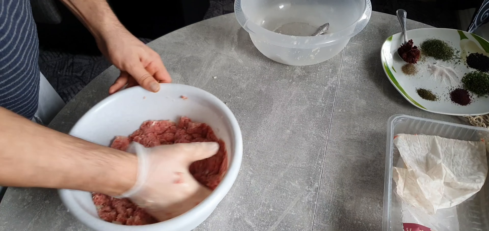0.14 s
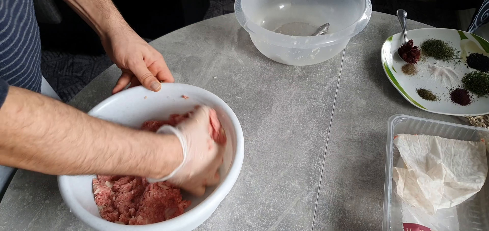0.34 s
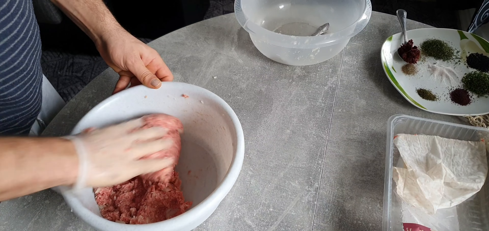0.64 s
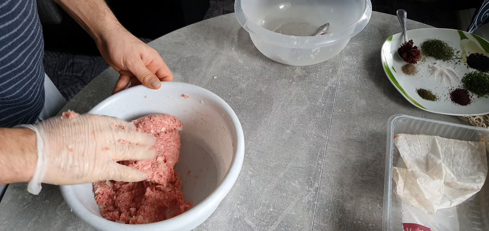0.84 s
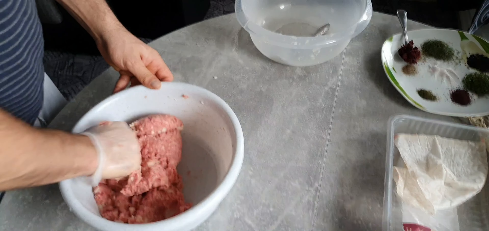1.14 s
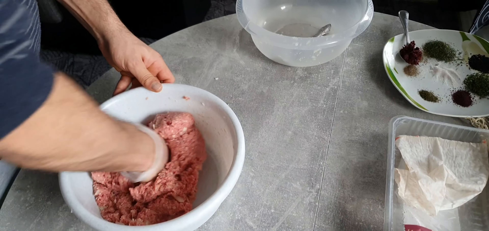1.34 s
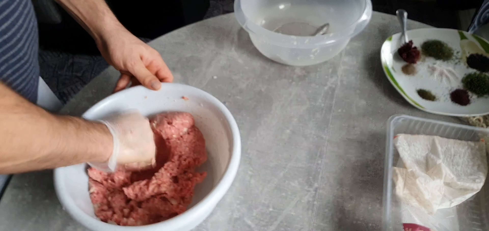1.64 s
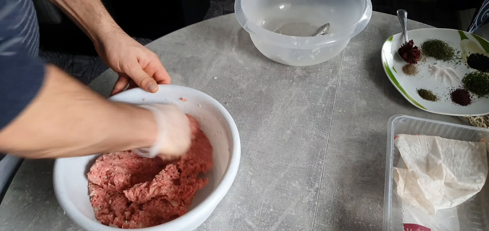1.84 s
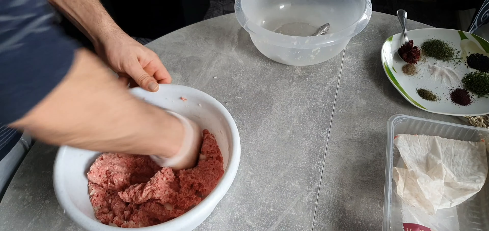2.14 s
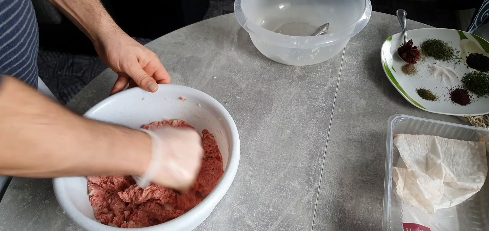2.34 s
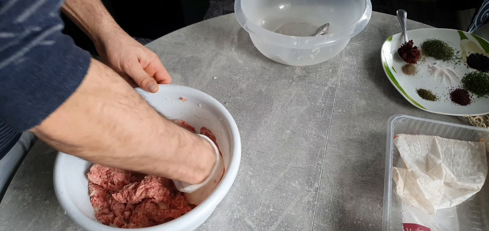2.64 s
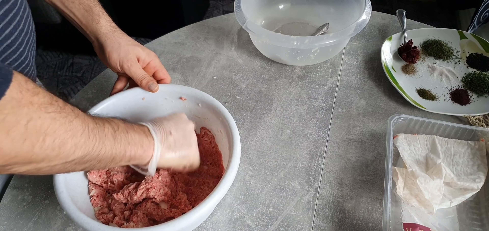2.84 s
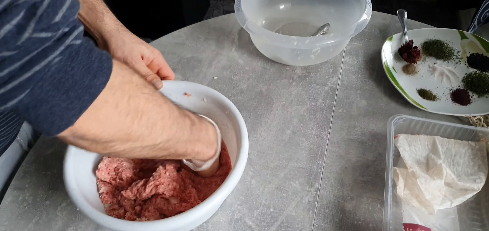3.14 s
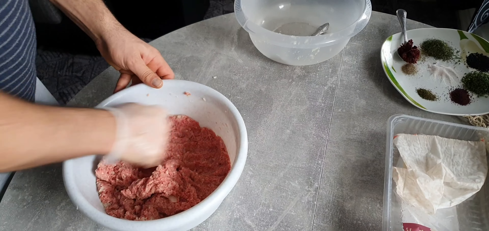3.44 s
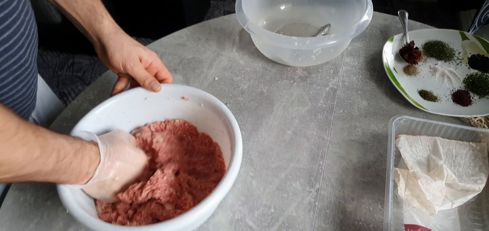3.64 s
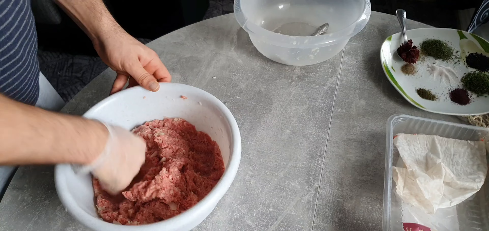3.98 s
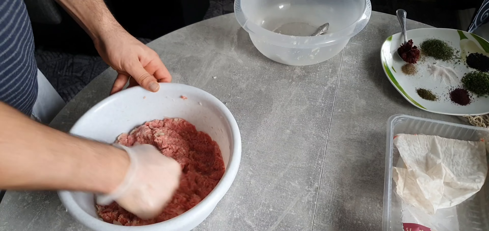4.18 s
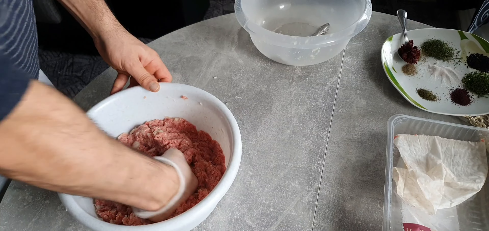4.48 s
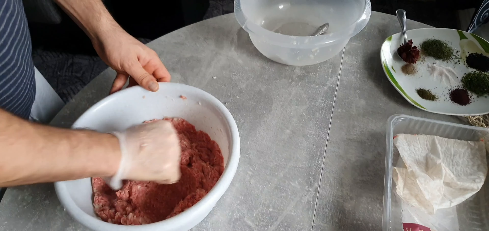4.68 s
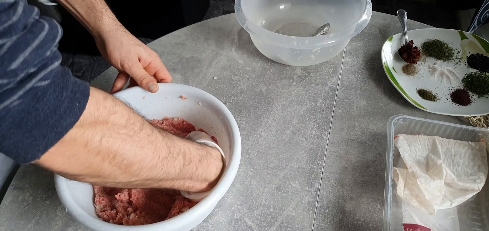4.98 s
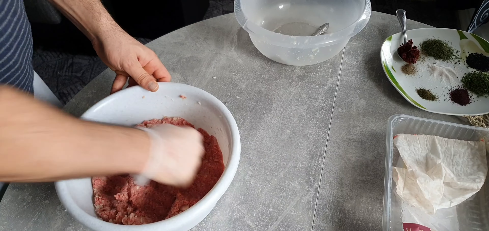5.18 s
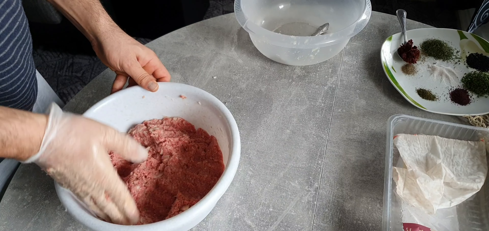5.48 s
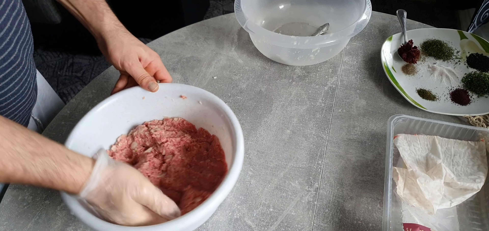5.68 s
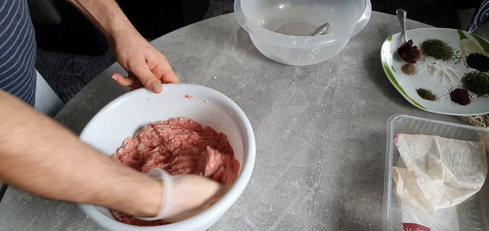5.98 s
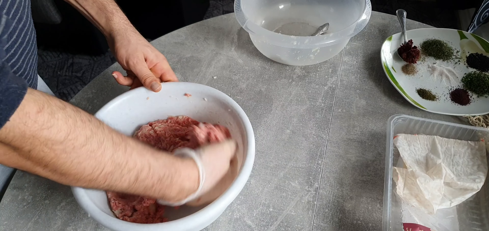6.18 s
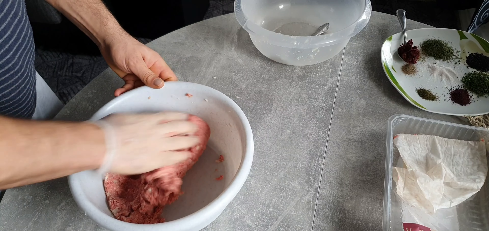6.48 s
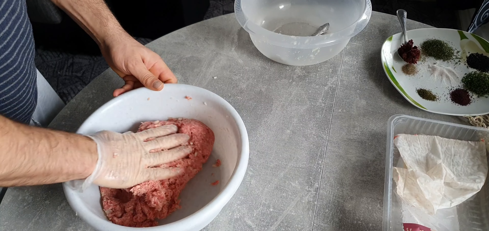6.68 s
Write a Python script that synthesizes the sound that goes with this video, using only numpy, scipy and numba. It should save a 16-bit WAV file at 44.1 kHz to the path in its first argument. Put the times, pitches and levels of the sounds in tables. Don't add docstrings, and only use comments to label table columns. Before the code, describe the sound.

A gloved hand works raw mince in a plastic bowl, very close, in a small quiet kitchen. Irregular wet squelches, popping air pockets and tiny sticky snaps of the glove peeling away come in uneven strokes. Firm slaps around one to one and a half seconds, three, and four to four and a half seconds make the bowl thump and the table hum low. The ending is softer, with light rubbing and crackle.

```python
import sys
import numpy as np
from scipy import signal
from scipy.fft import rfft, irfft
from scipy.io import wavfile
from scipy.ndimage import uniform_filter1d
from numba import njit

SR = 44100
rng = np.random.default_rng(int(sys.argv[2]) if len(sys.argv) > 2 else 0)


def to_wav(s):
    ch = np.atleast_2d(s).T
    pcm = np.round(np.clip(ch, -1, 1) * 32767)
    wavfile.write(sys.argv[1], SR, pcm.astype(np.int16))


def natural_amplitude(level_db):
    exponent = np.asarray(level_db, float) / 20
    return 10 ** exponent


N = 300762


def level(x, db):
    return x * natural_amplitude(db) / np.sqrt(np.mean(x ** 2))


def colour(x, points):
    hz, db = np.transpose(points)
    f = np.maximum(np.arange(N // 2 + 1) * SR / N, 1)
    gain = natural_amplitude(np.interp(np.log(f), np.log(hz), db))
    return irfft(rfft(x) * gain, N)


def band(x, lo_hz, hi_hz):
    return signal.sosfilt(signal.butter(2, [lo_hz, hi_hz], "band", fs=SR, output="sos"), x)


def ring(x, modes, damp=0.86):
    out = 0
    for hz, db, t60_s in modes:
        pole = np.exp(2j * np.pi * hz / SR - np.log(1000) / (t60_s * damp * SR))
        out = out + natural_amplitude(db) * signal.lfilter([1], [1, -pole], x).imag
    return out


def walk(rate_hz):
    hold = int(SR / rate_hz)
    return uniform_filter1d(np.repeat(rng.standard_normal(N // hold + 1), hold), hold)[:N]


def steady(x, span_s):
    power = uniform_filter1d(np.mean(x ** 2, axis=0), int(span_s * SR))
    return x / np.sqrt(power + 1e-12)


@njit
def bubbles(at_s, hz, cycles, size, glide, n, sr):
    out = np.zeros(n)
    for k in range(len(at_s)):
        step, phase, gain = 2 * np.pi * hz[k] / sr, 0., size[k]
        fall = np.exp(-hz[k] / sr / cycles[k])
        rise = 1 + glide * hz[k] / sr / cycles[k]
        i = int(at_s[k] * sr)
        while gain > .004 * size[k] and i < n and step < 2.8:
            out[i] += gain * np.sin(phase)
            phase, step, gain, i = phase + step, step * rise, gain * fall, i + 1
    return out


SWELL_DB, ONSET_DB_PER_S = 12.5, 490.5
SMOTHER_DB_PER_S = 126


def strokes(t, start_s, swell_s, hold_s, db, sag, fall, until_s=np.inf):
    coarse_t = t[::32]
    power = np.zeros(len(coarse_t))
    for end, start, up, hold, top_db in np.broadcast(until_s, start_s, np.maximum(swell_s, .001), hold_s, db):
        age = coarse_t - start - up
        shape = np.minimum(age, 0) * SWELL_DB / up
        shape -= sag * np.clip(age, 0, hold) + fall * np.maximum(age - hold, 0)
        shape += ONSET_DB_PER_S * np.minimum(age + up, 0)
        shape -= SMOTHER_DB_PER_S * np.maximum(coarse_t - end, 0)
        power += natural_amplitude(np.maximum(top_db + shape, -200)) ** 2
    return np.interp(t, coarse_t, power)


# (f/Hz, density/dB)
KITCHEN_SPECTRUM = [(18, -37), (30, -27), (118, 8), (233, -5), (319, -1.5), (404, -24), (526, -10),
                    (2410, -15.5), (16000, -25)]


def kitchen():
    return level(colour(rng.standard_normal((2, N)), KITCHEN_SPECTRUM), -76)


# (t/s, swell/s, hold/s, squelch level/dB, crackle above it/dB)
RUB_STROKES = [(-.02, 0.014, 0.23, -50.5, -19), (.22, 0.056, 0.13, -55.5, -3.5),
               (.46, 0.034, 0.069, -63.5, 4.5), (1.112, 0.032, 0.0072, -64.5, 2),
               (1.19, 0.025, 0.089, -56.5, 0), (1.50, 0.025, 0.017, -64.5, 0),
               (1.59, 0.015, 0.013, -44, -9), (2.41, .005, 0.05, -68, -9), (2.487, 0.0032, 0.14, -67.5, 6),
               (3.008, 0.014, .035, -51.5, -8), (3.09, 0.016, 0.052, -56, 3), (3.58, 0.048, 0.02, -49, -5),
               (3.635, 0.039, 0.1, -57, 8.5), (3.80, 0.0088, 0.097, -64, 4.5),
               (4.876, 0.018, 0.043, -59, -1), (4.925, 0.015, 0.02, -65, 7),
               (5.66, 0.086, 0.2, -51.5, -2.5), (5.85, 0.038, 0.11, -56, -5), (5.97, 0.023, 0.17, -61.5, 0),
               (6.20, 0.054, 0.04, -58.5, -2.5), (6.50, 0.12, 0.047, -56, -0.5)]
# (t/s, swell/s, hold/s, squelch level/dB, crackle above it/dB)
PEEL_STROKES = [(.04, 0.055, 0.078, -48.5, 2), (.55, 0.016, 0.2, -72.5, 15.5),
                (.70, 0.024, 0.026, -66.5, -1), (1.30, 0.1, 0.0027, -52.5, 6),
                (1.563, 0.0021, 0.039, -45.5, 2), (1.575, 0.015, 0.015, -37, 3),
                (1.82, 0.076, 0.15, -52, -1.5), (2.02, 0.01, .018, -55.5, -2.5),
                (2.124, 0.03, 0.036, -47.5, -7.5), (2.20, 0.0049, 0.0096, -52, 0),
                (2.43, 0.078, 0.0068, -49.5, -6), (2.711, 0.021, 0.0069, -51.5, -4),
                (2.73, 0.043, 0.0057, -51.5, -3), (3.305, 0.019, 0.047, -52, -2.5),
                (3.931, 0.0034, 0.0075, -57.5, 2.5), (3.945, 0.011, 0.013, -41.5, -12),
                (3.985, 0.0055, .004, -61, 12.5), (4.06, .01, .1, -84, 8), (4.19, 0.088, 0.15, -57, 0.5),
                (4.51, 0.049, .012, -65.5, 7), (4.563, 0.0067, 0.055, -48, -7),
                (4.81, 0.063, 0.068, -63, 1), (4.964, 0.0021, 0.0043, -67, 16),
                (5.095, 0.047, 0.04, -53.5, -4), (5.165, 0.017, 0.031, -58, -2.5),
                (5.31, 0.021, 0.097, -84.5, 10), (5.50, 0.07, 0.025, -69, -3),
                (5.59, 0.0069, 0.13, -59.5, -1), (6.29, .02, .05, -76, 11), (6.36, 0.11, 0.076, -70, 11.5),
                (6.68, .02, 0.035, -72, 6), (6.76, 0.069, .05, -62.5, 0)]
# (t/s, squelch level/dB, crackle above it/dB)
SLAP_HITS = [
    (0.434, -59.5, -3),
    (1.161, -47.5, -3.5),
    (1.6405, -41, -4.5),
    (3.0505, -45.5, -5),
    (3.0585, -49.5, 4),
    (3.574, -51.5, -21),
    (3.996, -54.5, -14),
    (4.04, -50, -22),
    (4.585, -47.5, -3.5),
    (5.292, -57.5, -9.5),
]
# (t/s, hold/s, bowl wall level/dB)
BASE_SCRAPES = [(0.133, 0.025, -47.5), (0.543, 0.025, -54.5), (1.332, 0.12, -52.5), (1.834, 0.069, -57.5),
                (2.125, 0.14, -64.5), (2.25, 0.024, -65), (2.75, 0.02, -61), (3.571, 0.026, -42.5),
                (3.687, 0.075, -49), (4.207, 0.18, -65.5), (4.562, 0.04, -58), (5.3, 0.017, -63),
                (6.087, 0.022, -56.5), (6.24, 0.054, -61), (6.38, 0.12, -64.5)]
# (wall re squelch/dB, deep re squelch/dB, then falls/dB/s: squelch, crackle, wall, deep)
PEEL_RELEASE = (-44.5, -19.5, 247, 231, 145, 190)
RUB_RELEASE = (-0.5, -5.5, 178, 179, 154, 154.5)
SLAP_RELEASE = (7, -7.5, 337, 222, 181, 144)
SAG_DB_PER_S = 29.5


def hand(t):
    slaps = [(s, 0.0007, 0.0037, db, crackle_db) for s, db, crackle_db in SLAP_HITS]  # swell/s, hold/s
    slap_s = np.append(np.transpose(SLAP_HITS)[0], np.inf)
    kinds = ((PEEL_STROKES, PEEL_RELEASE), (RUB_STROKES, RUB_RELEASE), (slaps, SLAP_RELEASE))
    power = 0
    for rows, (wall_db, deep_db, *falls) in kinds:
        s, swell, hold, db, crackle_db = np.transpose(rows)
        next_slap = slap_s[np.searchsorted(slap_s, s + .005)]
        offsets_db = (0, crackle_db, wall_db, deep_db)
        power = power + np.array([strokes(t, s, swell, hold, db + above, SAG_DB_PER_S, fall, next_slap)
                                  for above, fall in zip(offsets_db, falls)])
    s, hold, db = np.transpose(BASE_SCRAPES)
    power[2] += strokes(t, s, 0.0034, hold, db, SAG_DB_PER_S, 181)
    return np.sqrt(power)


def swarm(lo_hz, hi_hz, cycles, spread_db, hiss_db, flutter_db, count):
    c = rng.random((4, count))
    clump = np.repeat(rng.random((2, count // 12)), 12, axis=1)
    at_s = clump[0] * N / SR - .012 * np.log(c[0])
    hz = lo_hz * (hi_hz / lo_hz) ** clump[1] * 1.44 ** (c[1] - .5)
    size = natural_amplitude(-spread_db * np.log(c[2] + 0.011)) * np.sqrt(hz)
    popping = bubbles(at_s, hz, cycles * (.5 + c[3]), size, 0.137, N, 1. * SR)
    hiss = band(rng.standard_normal((3, N)), lo_hz, hi_hz)
    scattered = level(0.048 * hiss[0] + hiss[1:], hiss_db)
    return level((level(popping, 0) + scattered) * natural_amplitude(flutter_db * walk(60)), 0)


# (f/Hz, gain/dB)
WET_SPECTRUM = [(150, -18.5), (250, -7.5), (292, -10.5), (330, -20.5), (367, -12.5), (414, -15),
                (735, -17.5), (1200, -14), (1980, -10), (6590, -2), (7310, -11.5), (10700, -6), (13400, -6),
                (16000, -16.5)]
THREADS_PER_S, THREADS_DB = 70, -13


def mince(t):
    squelch, crackle, rub, depth = hand(t)
    wet = swarm(836, 4485, cycles=2.64, spread_db=2.5, hiss_db=-9, flutter_db=3.5, count=18000)
    fine = swarm(1900, 16000, cycles=0.2, spread_db=3.2, hiss_db=-3, flutter_db=2.0, count=48000)
    wall = swarm(296.0, 946, cycles=1.63, spread_db=3.0, hiss_db=4.0, flutter_db=2.5, count=9000)
    wet, fine, wall = (level(colour(v, WET_SPECTRUM), 0) for v in (wet, fine, wall))
    threads = rng.standard_normal(N) * (rng.random(N) < THREADS_PER_S / SR)
    fine = fine + level(band(threads, 3500, 15000), THREADS_DB)
    deep = level(band(wet[:, ::-1], 650, 2450), 0)
    return depth * deep + squelch * wet * natural_amplitude(-0.27) + crackle * fine * natural_amplitude(1.0) + rub * wall * natural_amplitude(-3.5)


# (t/s, sway level/dB, plate above it/dB)
TABLE_JOLTS = [(.0, -42, -2.5), (0.729, -49, -28), (0.874, -59, -9), (1.156, -37.5, -2.5),
               (1.644, -31, -5.5), (2.487, -36.5, -6), (3.054, -33, -1.5), (3.578, -43, -1.5),
               (4.04, -39.5, -21), (4.586, -33, -16), (4.882, -36.5, -11)]
# (t/s, hold/s, sway level/dB, plate above it/dB)
BOWL_LEANS = [(0.123, 0.36, -52.5, -2.5), (0.472, 0.11, -59.5, -1), (1.3, 0.21, -44.5, -9.5),
              (1.69, 0.031, -35, -11), (1.83, 0.054, -49.5, -2), (1.948, 0.089, -49.5, -14),
              (2.14, 0.08, -54.5, -24), (2.233, 0.18, -47, -16), (2.61, 0.27, -48.5, -17.5),
              (3.009, 0.045, -39, -2), (3.206, 0.27, -48, -16), (3.636, 0.48, -40.5, -8.5),
              (4.06, 0.16, -50.5, 0), (4.23, 0.38, -49, -14), (4.78, 0.13, -51, -4),
              (4.957, 0.02, -40.5, -26), (5.095, 0.11, -50.5, -10.5), (5.277, 0.028, -53.5, -21),
              (5.51, 0.12, -62.5, -13), (5.639, 0.14, -50, -10), (5.818, 0.13, -59, -7),
              (5.956, 0.13, -54.5, -10), (6.203, 0.14, -69.5, 2.5), (6.463, 0.25, -62.5, -7.5),
              (6.637, 0.034, -58, -5)]
JOLT_FALL_DB_PER_S, LEAN_FALL_DB_PER_S = (175, 136.5), (193, 116)


def load(t):
    jolt_s, jolt_db, jolt_plate_db = np.transpose(TABLE_JOLTS)
    lean_s, hold, lean_db, lean_plate_db = np.transpose(BOWL_LEANS)
    parts = zip((0, jolt_plate_db), (0, lean_plate_db), JOLT_FALL_DB_PER_S, LEAN_FALL_DB_PER_S)
    gains = []
    for jolt_above, lean_above, jolt_fall, lean_fall in parts:
        jolts = strokes(t, jolt_s, 0.011, 0.034, jolt_db + jolt_above, 0, jolt_fall)
        leans = strokes(t, lean_s, 0.018, hold, lean_db + lean_above, 14, lean_fall)
        gains.append(np.sqrt(jolts + leans))
    return gains


# (f/Hz, level/dB, t60/s)
TABLE_MODES = [(56.2, 3, 0.11), (68.35, -8, 0.47), (105.7, 1.5, 0.1), (125.1, -3.5, 0.49),
               (156.4, -12.5, 0.4)]
# (f/Hz, level/dB, t60/s)
BOWL_MODES = [(209, -16.5, 0.51), (264.2, -7.5, 0.15), (292.4, -2, 0.11), (362, -17, 0.28),
              (500, -20, 0.16), (555, -6.5, 0.076), (654.4, -13, 0.22), (767, -43.5, 0.17),
              (946, -9, 0.036)]


def shaking(t):
    swaying, humming = load(t)
    jolts = rng.standard_normal((3, N)) * natural_amplitude(4.7 * walk(25))
    sway = ring(jolts[0] + 1.23 * jolts[1:], TABLE_MODES[:2], 0.78)
    sway = steady(sway, .09)
    plate = ring(jolts[0] + 0.28 * jolts[1:], TABLE_MODES[2:] + BOWL_MODES[:4], 0.74)
    plate = steady(plate, 0.12) * natural_amplitude([[-.8], [.8]])
    return natural_amplitude(3.0) * swaying * sway + natural_amplitude(-1.5) * humming * plate


# (t/s, peak level/dB, f/Hz, tick above it/dB)
POCKET_BURSTS = [(0.0096, -26, 2310, -50), (0.2134, -51, 1170, -29), (0.2495, -51, 1150, -29),
                 (0.4391, -21, 2080, -28), (0.713, -40.5, 3510, -17.5), (1.113, -59, 1500, -16),
                 (1.1387, -48, 960, -18), (1.5651, -25, 2360, -29), (1.5724, -33, 2910, -12),
                 (1.6028, -26, 895, -30), (1.6113, -19, 2860, -20), (1.6124, -22.5, 800, -33),
                 (2.161, -52, 1530, -24), (2.4158, -48, 960, -28), (2.722, -57, 4970, -26.5),
                 (3.0475, -15.5, 2220, -32), (3.0583, -20.5, 1600, -22.5), (3.117, -44, 5000, -3),
                 (3.124, -36, 1900, -25), (3.3182, -53, 1540, 1.5), (3.3575, -30, 2610, -19),
                 (3.606, -30.5, 2320, -26), (3.962, -47, 1470, -26), (3.998, -27, 1960, -18),
                 (4.5669, -26.5, 1380, -21.5), (4.97, -44.5, 5000, -5), (5.289, -52, 1150, -13),
                 (5.5944, -43.5, 4590, -16), (5.886, -33.5, 1200, -17), (5.9135, -33, 1130, -21),
                 (6.2838, -38, 3100, -23), (6.387, -41.5, 1080, -20.5), (6.6986, -39, 2030, -46)]


def pops():
    s, db, hz, tick_db = np.transpose(POCKET_BURSTS)
    s = s + 0.00072
    note = bubbles(s, hz, np.full(len(s), 1.1), natural_amplitude(db - 2.5), 0.044, N, 1. * SR)
    tick = np.zeros((2, N))
    decay = np.exp(-np.arange(300) / 45)
    for at, size, noise in zip(s, natural_amplitude(db + tick_db + 19.0), rng.standard_normal((len(s), 2, 300))):
        i = int(at * SR)
        tick[:, i:i + 300] += size * noise * decay
    return note + band(tick, 1600, 5300)


# (t/s, level/dB, centre f/Hz)
THREAD_SNAPS = [(0.0106, -58, 3400), (0.4951, -54, 3500), (0.5174, -46, 4400), (0.5981, -49, 9300),
                (0.715, -54, 4400), (0.732, -53, 4000), (1.164, -29.5, 2800), (1.3075, -46, 9400),
                (1.387, -43, 8200), (1.326, -45, 9000), (1.3978, -34, 9000), (1.4189, -48, 10400),
                (1.4601, -45, 7300), (1.567, -31, 9200), (1.5729, -29, 9000), (1.576, -24, 8400),
                (1.6451, -33, 5200), (2.5234, -45, 3600), (2.628, -59, 9920), (2.634, -57, 7200),
                (2.65, -54, 5000), (2.7219, -34, 5500), (2.76, -52, 5500), (2.73, -40.5, 4000),
                (3.014, -49, 3000), (3.0486, -39, 3200), (3.0585, -37.5, 7000), (3.0619, -44, 7600),
                (3.121, -47, 8400), (3.1714, -51, 5100), (3.3037, -62, 5040), (3.357, -45, 3900),
                (3.372, -46, 5000), (3.39, -39.5, 3800), (3.5775, -59, 3380), (3.6481, -48, 7300),
                (3.6716, -37, 5100), (3.7125, -44, 4500), (3.762, -46, 10000), (3.996, -47, 5600),
                (3.9994, -38, 6360), (4.0407, -48, 6300), (4.5707, -49, 3400), (4.956, -44, 5000),
                (4.971, -38.5, 7700), (4.9792, -37, 5300), (5.0928, -55, 5070), (5.181, -44, 3880),
                (5.9125, -46, 2500), (5.9145, -48, 5400), (6.015, -56, 10500), (6.216, -54, 6900),
                (6.2846, -47, 3600), (6.297, -57, 8000), (6.4187, -53, 10100), (6.4335, -49, 9500),
                (6.484, -47, 7000), (6.553, -53, 9000), (6.577, -54, 4500), (6.6979, -61.5, 3110)]
SNAP_MS, SPATTER_MS, SPATTER_DB = .3, 2.3, -17
SNAP_SPAN = 1.9


def ticks():
    out = np.zeros((2, N))
    age_ms = np.arange(400) * 1000 / SR
    shape = np.exp(-age_ms / SNAP_MS) + natural_amplitude(SPATTER_DB) * np.exp(-age_ms / SPATTER_MS)
    for (s, db, hz), g in zip(THREAD_SNAPS, rng.standard_normal((len(THREAD_SNAPS), 3, 400))):
        spit = band((g[0] + 1.1 * g[1:]) * shape, hz / SNAP_SPAN, min(hz * SNAP_SPAN, 17000))
        spit = spit + natural_amplitude(-8) * band((g[0] + .5 * g[1:]) * shape, 6900, 19000)
        i = int((s - .0003) * SR)
        out[:, i:i + 400] += natural_amplitude(db + 10.0) * spit / np.abs(spit).max()
    return out


# (t/s, bowl ring level/dB, then above it/dB: table sway, plate, crack)
BOWL_HITS = [(0.026, -38.5, -3, -13, 6), (0.438, -55, -26, -30, 6), (0.729, -69, 31.5, -14, 0),
             (.745, -70.5, 34.5, -11, -20), (0.763, -74, 35.5, -11, -20), (0.883, -69.5, 24.5, -18, -25),
             (1.134, -45, -16, -2.5, -16), (1.162, -27, 1, -14, -6), (1.6425, -21, -17, -13, 8.5),
             (2.488, -39, 7, -1, -24), (3.015, -36.5, -11.5, -13, -4), (3.0558, -20, -23, -7.5, -12),
             (3.578, -39, -21, -2.5, -8), (4.0398, -29, -26, -12.5, 10), (4.589, -30.5, -2, -5.5, -5),
             (4.886, -44.5, 6, 7, -18), (5.294, -56, 0, -33, -6)]
PUSH_MS = 2.3


def thumps():
    push, plate, knock, crack = np.zeros((4, N))
    grit = rng.standard_normal((len(BOWL_HITS), 1500))
    age = np.arange(1500)
    slap = np.sin(2 * np.pi * age / 36) * np.exp(-age / 30)
    n = int(PUSH_MS * SR / 1000)
    shove = np.hanning(n) / n
    for (s, db, sway_db, plate_db, crack_db), g in zip(BOWL_HITS, grit):
        i = int((s + 0.001207) * SR)
        push[i:i + n] -= natural_amplitude(db + sway_db) * shove
        plate[i:i + n] -= natural_amplitude(db + plate_db) * shove
        knock[i:i + 1500] += natural_amplitude(db) * (0.23 * g * np.exp(-age / 250) - np.exp(-age / 14)) / 14
        gritting = g * (np.exp(-age / 25) + 0.35 * np.exp(-age / 300))
        crack[i:i + 1500] += natural_amplitude(db + crack_db) * (slap + gritting)
    table = ring(push, TABLE_MODES[:2]) * natural_amplitude(2.5) + ring(plate, TABLE_MODES[2:]) * natural_amplitude(11.0)
    bowl = ring(knock, BOWL_MODES) * natural_amplitude(-4.0) + band(crack, 300, 4200) * natural_amplitude(-5.0)
    return table, bowl


# (t/s, length/s, f/Hz, rise ratio, level/dB)
SUCKING_POCKETS = [(.085, 0.1, 1046, 1.1, -54), (0.135, .06, 610, 0.96, -61),
                   (0.211, 0.0081, 1140, 1.07, -47.5), (0.27, 0.0084, 1190, 1.1, -56),
                   (0.243, 0.036, 1190, 0.87, -58.5), (0.444, 0.056, 2180, 1.26, -56),
                   (1.568, 0.019, 2350, 0.94, -43), (1.571, .012, 3100, .8, -39),
                   (1.591, 0.012, 1960, 2.3, -27.5), (1.599, 0.013, 2470, 1.5, -28),
                   (1.611, 0.016, 2760, 1.25, -39), (1.612, 0.01, 3900, 1.4, -42),
                   (1.891, 0.031, 1900, 0.85, -52.5), (2.142, 0.017, 1510, 0.8, -78),
                   (2.575, 0.064, 1700, 1.03, -70.5), (3.577, 0.016, 927, 1.63, -52),
                   (3.581, 0.051, 2240, 1.14, -48.5), (3.686, 0.049, 3940, 1.02, -44),
                   (3.946, 0.011, 1440, 1.33, -44), (3.96, 0.0052, 1600, 0.86, -37.5),
                   (3.962, .012, 3300, 0.88, -44), (3.969, 0.015, 1800, .85, -56),
                   (4.004, 0.014, 1900, .9, -50), (4.04, 0.016, 1500, 1.1, -46),
                   (4.561, 0.024, 1250, 1.11, -49.5), (4.577, 0.031, 436, 0.79, -49.5),
                   (4.652, 0.034, 496, .9, -60.5), (5.108, 0.021, 1650, 0.93, -59),
                   (5.129, .01, 1530, 0.95, -55), (5.141, 0.02, 1620, 0.79, -59),
                   (5.298, 0.024, 1005, 1.1, -63), (5.301, 0.023, 1900, 1.1, -60),
                   (5.324, .03, 800, 0.76, -68), (5.126, 0.022, 3400, 1.2, -48),
                   (5.694, 0.044, 1225, 0.9, -57), (5.886, 0.046, 1100, 1.1, -56),
                   (5.878, 0.034, 1530, 0.79, -58), (6.239, 0.06, 847, 0.754, -63.5),
                   (6.599, 0.042, 1480, 1.3, -66), (6.596, .05, 2490, .9, -58)]


def smacks():
    s, length, hz, rise, db = np.transpose(SUCKING_POCKETS)[:, :, None]
    when, off, size = rng.random((len(SUCKING_POCKETS), 3, 36)).transpose(1, 0, 2)
    at_s = s + length * when
    pitch = hz * rise ** when * 1.14 ** (off - .5)
    gain = natural_amplitude(db - 3.0 - 5.75 * np.log(size + 0.032)) * np.sqrt(length / 0.11)
    return bubbles(at_s.ravel(), pitch.ravel(), np.full(when.size, 4.5), gain.ravel(), 0.048, N, 1. * SR)


ROOM_T60_S, ROOM_DB = 0.21, -11.5


def room(air):
    t = np.arange(SR // 2) / SR
    tail = band(rng.standard_normal((2, SR // 2)), 267, 4450)
    tail = tail * 1000 ** (-t / ROOM_T60_S) * (t > .004)
    tail = tail / np.sqrt(np.sum(tail ** 2) / 2)
    return signal.fftconvolve(air, tail, axes=1)[:, :N] * natural_amplitude(ROOM_DB)


PORT_LAG_SAMPLES = 4.59


def lag(x):
    turns = np.arange(N // 2 + 1) / N
    return irfft(rfft(x) * np.exp(-2j * np.pi * turns * PORT_LAG_SAMPLES), N)


def scene():
    t = np.arange(N) / SR
    table, bowl = thumps()
    air = mince(t) + smacks() + pops() + ticks() + bowl
    air[1] = lag(air[1])
    solid = (table + shaking(t)) * natural_amplitude([[-.2], [.2]])
    return air + room(air) + solid + kitchen()


def band_limit(x):
    return signal.sosfilt(signal.butter(12, 16520, fs=SR, output="sos"), x)


def record(dry):
    x = signal.sosfilt(signal.butter(4, 46, "high", fs=SR, output="sos"), dry)
    x = x + band(x, 14000, 15000) * np.array([[.15], [-.15]])
    x = signal.sosfilt(signal.ellip(10, .5, 50, 15850, fs=SR, output="sos"), x)
    return band_limit(x)


dry = scene()
out = record(dry)
to_wav(out)
```